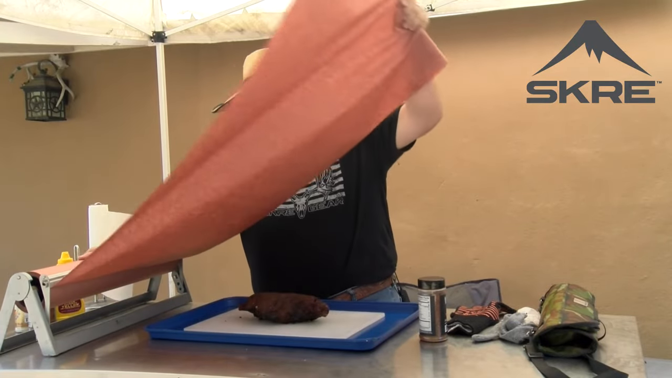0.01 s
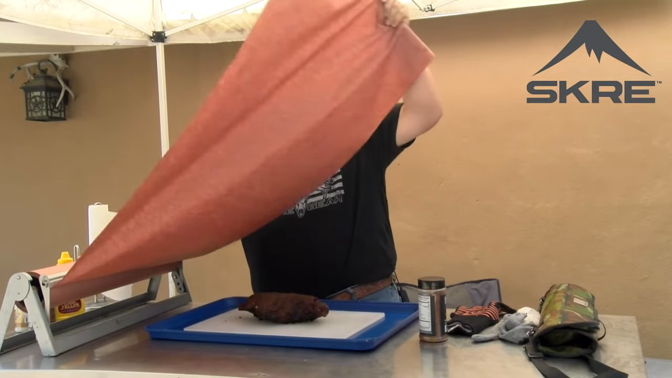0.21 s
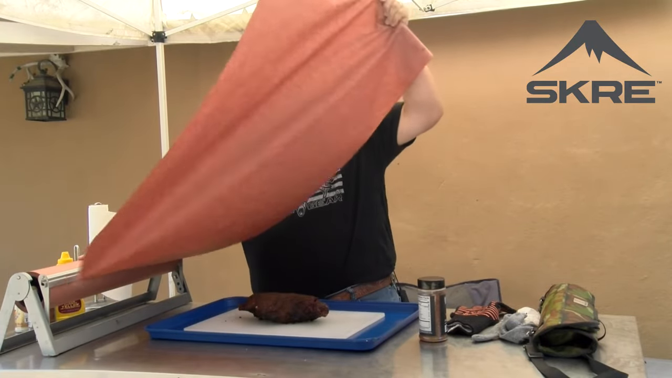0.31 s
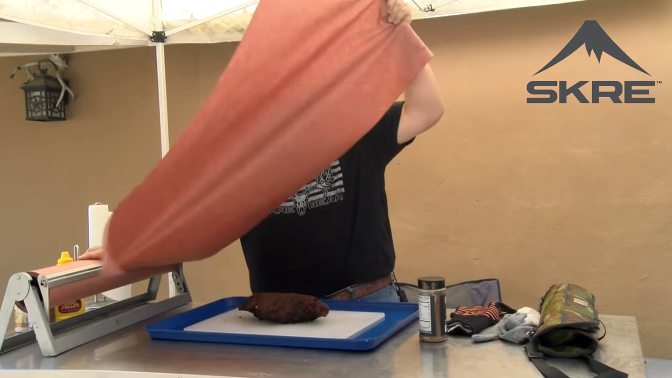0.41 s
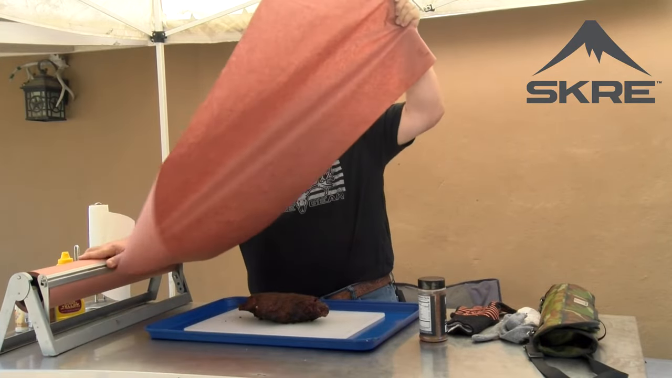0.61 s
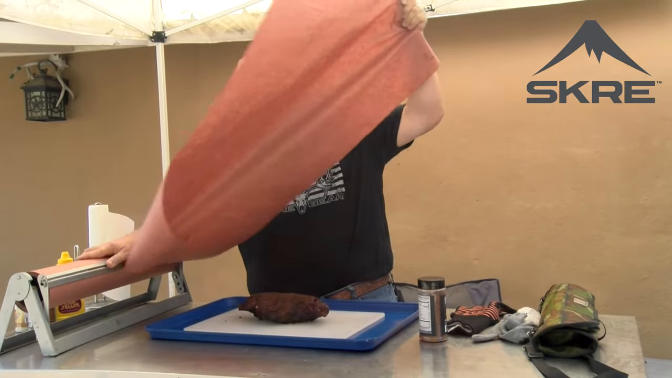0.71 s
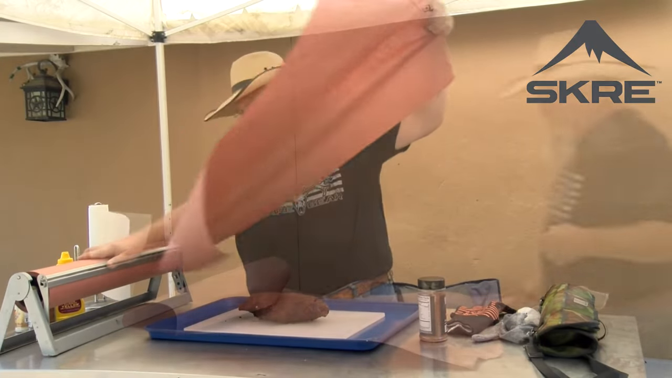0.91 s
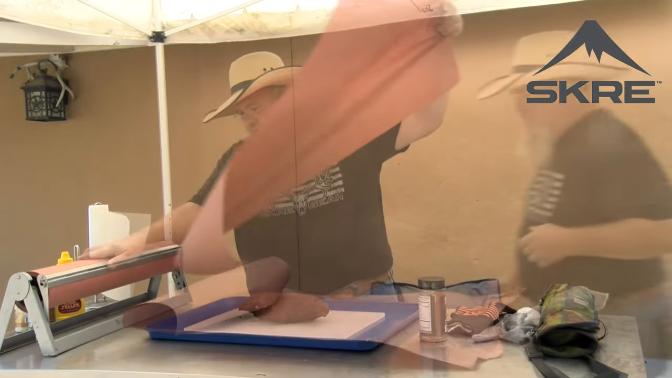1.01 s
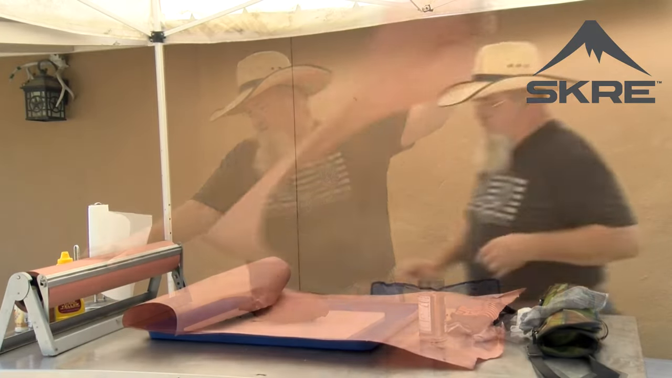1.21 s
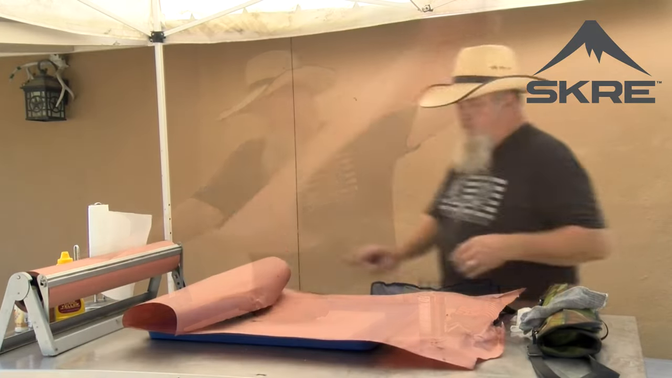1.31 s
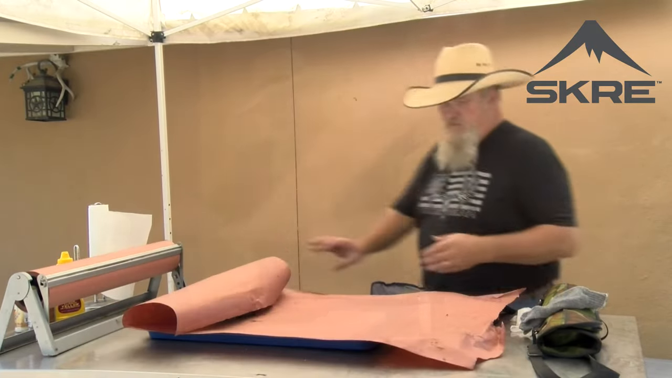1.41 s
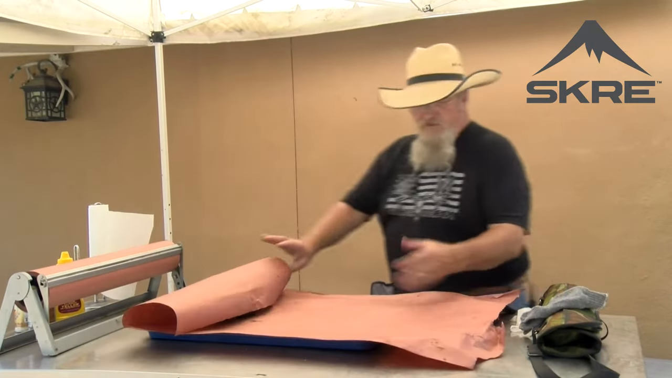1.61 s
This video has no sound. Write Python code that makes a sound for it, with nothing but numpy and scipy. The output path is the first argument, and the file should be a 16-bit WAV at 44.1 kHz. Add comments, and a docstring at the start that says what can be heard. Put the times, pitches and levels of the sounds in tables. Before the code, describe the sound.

Stiff paper tearing: faint rustle and small crackles first, then a loud, coarse rip from about 0.19 s, with sharp snaps near 0.25-0.29 and low flapping. It eases around 0.5-0.66, surges again until 1.05, then drops quickly. Soft rustles and sparse crease ticks follow at 1.15, 1.33 and 1.48 over faint hiss; a tiny dropout at 1.58, a dull faint knock at 1.68. Close, dry, slightly overloaded.

```python
"""Under a canopy, a long sheet of stiff paper is ripped off a roll against a blade in a few tugs,
then settles on a table with a soft rustle and a few creases; the sound drops out for an instant near the end.
Tearing is a random train of short pops with fibre fizz, rasp, flap and blade ring; creases are single pops.
Rustle, slides, rumble and air are shaped random signals, the knock on the table is a decaying sine,
and the canopy answers the paper and the knock with a short dull tail."""
import sys
import numpy as np
from scipy import signal
from scipy.io import wavfile
from scipy.ndimage import uniform_filter1d

SR = 44100
rng = np.random.default_rng(int(sys.argv[2]) if len(sys.argv) > 2 else 0)


def to_wav(sig):
    """Store sig (one row per channel, or 1-D mono) as 16-bit WAV at the path in sys.argv[1].

    Samples outside -1..1 are clipped; the rate is SR.
    """
    pcm = np.clip(np.atleast_2d(sig), -1, 1) * 32767
    pcm = np.round(pcm).astype(np.int16)
    wavfile.write(sys.argv[1], SR, pcm.T)  # frames by channels


N = 74970

# The tugs, one table each. Each row: time in seconds, level of the sheet's pops in dB, then fibre fizz
# and low flap in dB over the pops, pitch of the sheet in Hz, pitch of the rasp in Hz,
# then top treble and blade ring in dB over the pops.
TUGS = [
    [(0.084, -47, -11, 5, 1280, 6460, -48, -6), (0.102, -35.5, 2.5, -18.5, 1330, 6340, -19, -15),
     (0.135, -36.5, -4, -3.5, 1390, 6350, -22, -18), (0.139, -28, -9, -24, 1410, 6330, -30, -11),
     (0.154, -40.5, -3, -5, 1326, 6220, -23, -8), (0.18, -38, -7, 1, 1190, 5670, -46, -19),
     (0.186, -37, -3, -7, 1170, 5580, -31, -6), (0.19, -47, -21, -15, 1120, 5570, -33, 1)],
    [(0.194, -13, -20, -15, 1353, 6320, -38, -17), (0.202, -32, -3, 10.5, 1480, 6380, -26, -10),
     (0.212, -14.5, -13, -26, 1440, 6500, -27, -26), (0.218, -30.5, 7, -5, 1520, 6700, -25, -28),
     (0.248, -27, -9.5, -5.5, 1370, 6660, -25, -29), (0.25, -38, 16, -27, 1270, 6500, -34, -14)],
    [(0.253, -15.5, -8.5, -15.5, 1278, 5700, -35, -17.5), (0.281, -17.5, -2.5, -9.5, 1183, 5400, -23, -9),
     (0.323, -9.5, -12.5, -26, 1281, 6560, -27, -20.5), (0.369, -17, -4, -15, 1315, 6000, -25, -36),
     (0.413, -20.5, -5, -12, 1313, 6300, -32, -28), (0.432, -29.5, -7, -6, 1180, 6360, -23, -38),
     (0.461, -30.5, -5.5, -9, 1320, 6400, -31, -15), (0.505, -38.5, -10, -5.5, 1230, 6820, -34, -9)],
    [(0.509, -27, -20, -26, 1400, 6700, -27, -30), (0.519, -28, -5.5, -10, 1440, 6590, -30, -6),
     (0.545, -21.5, -13.5, -8.5, 1320, 7040, -25, -23), (0.562, -15.5, -8, -17, 1390, 8400, -23, -14.5),
     (0.601, -35, -6.5, -6.5, 1405, 7600, -33, -12), (0.619, -29, -4.5, -7.5, 1375, 7400, -26, -2.5),
     (0.651, -35.5, -10, -2.5, 1800, 5840, -26, -27), (0.66, -39.5, 1, 8, 1830, 5700, -32, -17)],
    [(0.664, -40, 7, -9, 1560, 6410, -26, -11), (0.674, -24, -7.5, -14, 1484, 6600, -23, -40),
     (0.712, -13, -9, -9, 1380, 6800, -41, -35), (0.764, -16, -11.5, -15, 1527, 5500, -33, -10.5),
     (0.808, -13.5, -10, -8.5, 1496, 6400, -32, -9), (0.862, -12, -8, -12, 1848, 6300, -41, -17),
     (0.908, -18.5, -8.5, -5.5, 2270, 6860, -45, -3), (0.96, -22, 1, -6, 2070, 7900, -42, 0.5),
     (0.996, -17.5, 1.5, -8, 1590, 7540, -39, -2), (1.009, -18, -3.5, -7, 1514, 7060, -34, -14),
     (1.022, -14.5, -1, -10, 1482, 6040, -33, -17), (1.048, -20.5, 3, -5.5, 1520, 5560, -30.5, -8.5)],
]
# Colours of the fibre fizz, its top treble and the flap. Each row: frequency in Hz, relative density in dB per Hz.
FIZZ_COLOUR = [(1650, -9), (2800, -8.5), (3250, -9.5), (4140, -7), (5200, -10.5), (5630, -8.5),
               (7980, -18.5), (9440, -10), (11800, -34.5), (15300, -28), (22000, -120)]
TREBLE_COLOUR = [(9000, -21), (11500, -8), (14600, 0), (16300, -9)]
FLAP_COLOUR = [(88, -47.5), (150, -20.5), (247, -17.5), (310, -5.5), (650, -4.5), (840, -25), (1430, -120)]
POPS_PER_S, POP_SPREAD_DB, POP_CYCLES, PITCH_SPREAD = 2200, 2.5, 0.647, .17  # pitch spread is in log units
FIBRES_PER_S, FIBRE_SPREAD_DB, CLUMP_DB = 6000, 2.5, 1.7
RASP_DB, RASP_WIDTH_HZ, PATCH_DB = -2, 3100, 2.5  # rasp level is over the fizz
BLADE_HZ, BLADE_WIDTH_HZ = 2853, 1060  # the blade's edge sings along


def tearing_pops(train):
    """Impulse excitation: each notch that gives way sets off one pop scattered around the sheet's pitch."""
    pitches = np.geomspace(500, 3600, num=28)
    scattered = joined(TUGS, column=4) * np.exp(PITCH_SPREAD * rng.standard_normal(N))
    bin_of = np.searchsorted(pitches, scattered)
    pops = np.zeros(N)
    for k, hz in enumerate(pitches):
        shape = np.sqrt(hz) * pop(hz, POP_CYCLES)  # the root gives every pitch equal energy
        pops += signal.oaconvolve(train * (bin_of == k), shape)[:N]
    return evened(pops)


def fibre_fizz(jolts):
    """Superposed micro-fractures: dense tiny clicks, joined by the notches' jolts, make fizz, rasp and treble."""
    breaks = evened(clicks(FIBRES_PER_S, FIBRE_SPREAD_DB) * random_signs())
    fibres = (breaks + 0.48 * jolts) * clumps(0.72, size=200)
    rasp = resonate(fibres * random_signs(), joined(TUGS, column=5), RASP_WIDTH_HZ)
    fizz = patchy(colour(fibres, FIZZ_COLOUR) + amp(RASP_DB) * rasp, PATCH_DB)
    treble = patchy(colour(fibres, TREBLE_COLOUR), 1.3)
    return fizz * amp(joined(TUGS, column=2)) + treble * amp(joined(TUGS, column=6))


def low_flap(jolts):
    """Broadband forcing: noise and the notches' jolts, coloured low, make the sheet's flap."""
    flap = patchy(colour(rng.standard_normal(N) + 1.04 * jolts, FLAP_COLOUR), 1.65)
    return flap * amp(joined(TUGS, column=3))


def blade_ring(jolts):
    """Driven resonance: the notches' jolts excite one fixed, heavily damped mode of the blade."""
    ring = resonate(jolts * random_signs(), np.full(N, BLADE_HZ), BLADE_WIDTH_HZ)
    return ring * amp(joined(TUGS, column=7))


def rip():
    """Fracture as a random point process: one train of giving notches drives pops, fizz, flap and blade."""
    train = clicks(POPS_PER_S, POP_SPREAD_DB)
    jolts = evened(train - train.mean())
    pops = tearing_pops(train)
    driven = fibre_fizz(jolts) + low_flap(jolts) + blade_ring(jolts)
    level = evened(clumps(CLUMP_DB, size=150)) * amp(joined(TUGS, column=1))
    return level * inside(TUGS) * (patchy(pops, 1.0) + driven)


# Single creases and notches. Each row: start in seconds, level of the pop in dB, pitch in Hz,
# brightness of the tick in dB over the pop, ring in cycles (held within 0.4 to 2.2).
CREASES = [(0.061, -30.5, 990, -7, 0.76), (0.085, -23.5, 2300, -9, 0.72), (0.098, -34, 1140, -16, 1.1),
           (0.1375, -19, 1530, -18, 1.18), (0.193, -8.5, 1920, -18.5, 0.7), (0.207, -24, 1200, -18, 0.64),
           (0.211, -6, 1570, -16.5, 0.71), (0.225, -20, 1200, -10, 0.94), (0.236, -18, 1250, -9, 1.17),
           (0.253, 0.5, 1285, -17, 0.87), (0.268, -6.5, 1000, -16, 1.03), (0.274, -7, 1000, -4, 0.86),
           (0.286, -1.5, 980, -27, 1.08), (0.393, -3, 1280, -16, 0.39), (0.414, -1, 1190, -20, 0.42),
           (0.509, -19, 1040, -13, 0.78), (0.535, -10, 1690, -28, 0.48), (0.62, -13, 1470, -7, 0.96),
           (0.6609, -9.5, 1980, -8, 0.73), (0.668, -28, 1840, -12, 0.54), (0.698, -8, 1200, -4.5, 1.12),
           (0.713, -5, 2010, -23, 0.86), (0.744, -10, 1170, -28, 1.1), (0.979, -14, 1380, -9, 0.8),
           (1.013, -8, 1410, -11, 0.64), (1.0226, -1.5, 1400, -20, 0.87), (1.029, -7.5, 1440, -5, 0.69),
           (1.044, -7.5, 1470, -26, 0.93), (1.144, -24, 1394, -45, 1.9), (1.1592, -20, 1820, -38, 1.9),
           (1.221, -32.5, 1500, -7, 0.57), (1.3272, -36, 2600, -15, 1.3), (1.4776, -27, 1960, 3.5, 1.7),
           (1.678, -37, 1135, -23, 1.81), (1.683, -36.5, 1170, -25, 1.9)]
# Colour of a snap's tick. Each row: frequency in Hz, relative density in dB per Hz.
TICK_COLOUR = [(1800, -21), (2900, 2), (5670, 1), (9500, -8), (16000, -29)]
SNAP_TAIL_S, SNAP_TAIL_DB, TICK_S = 0.0028, -9.5, 0.0014  # times are to 1/e


def snaps():
    """Transient response: each crease or notch is one strong pop, a bright tick and a short crackling tail."""
    length = 2000  # samples a snap
    out, t = np.zeros(N + length), np.arange(length) / SR
    noises = rng.standard_normal((len(CREASES), length))
    hiss = colour(rng.standard_normal(N), TICK_COLOUR)
    for (s, db, hz, bright_db, cycles), noise in zip(CREASES, noises):
        at = round(s * SR)
        swing = pop(hz, np.clip(cycles, .4, 2.2))
        crackle = evened(signal.fftconvolve(noise, swing)[:length])
        tail = crackle * np.exp(-t / SNAP_TAIL_S) * amp(SNAP_TAIL_DB)
        u = (t - (2 * cycles - .5) / hz) / TICK_S  # the tick starts as the spike rises
        tick = np.roll(hiss, -at)[:length] * (u > 0) * np.exp(-abs(u)) * amp(bright_db)
        spike = np.r_[swing, np.zeros(length - len(swing))]
        out[at:at + length] += amp(db) * (spike + tail * np.minimum(t * hz, 1) + tick)
    return out[:N]


# The stretches of rustle, one table each. Each row: time in seconds, level of the body in dB,
# fizz in dB over the body.
RUSTLES = [
    [(0.0, -33.5, -6.5), (0.016, -55.5, -0.5), (0.034, -42.5, -10), (0.056, -57, -7), (0.062, -47, -31),
     (0.074, -45, -9), (0.082, -48, -9)],
    [(1.048, -14, -27), (1.058, -26, -9), (1.108, -41, -5.5), (1.164, -34, -17.5), (1.19, -52, -3.5),
     (1.321, -47, -6.5), (1.326, -35, -6.5), (1.342, -42, -4), (1.35, -49, -3), (1.39, -42.5, -8),
     (1.4, -42.5, -8.5), (1.466, -51, -1), (1.476, -37, -8)],
    [(1.48, -39, -1), (1.5, -42, -6), (1.54, -48.5, -2.5), (1.566, -42, -8), (1.578, -55, 7),
     (1.582, -54, 13)],
    [(1.672, -68, -17), (1.676, -53, 5), (1.678, -49, -7), (1.684, -47, -16), (1.7, -60, -17)],
]
# Colours of the rustle's body and of its treble. Each row: frequency in Hz, relative density in dB per Hz.
BODY_COLOUR = [(88, -54), (150, -14.5), (351, -5.5), (446, 1.5), (496, -2), (674, -4.5), (952, -1),
               (2030, -5.5), (3600, -18), (4680, -30), (7920, -120)]
SILK_COLOUR = [(1760, -10), (3000, -1.5), (4400, -1), (4930, -2), (9110, -9), (11100, -20), (15600, -23)]


def rustle():
    """Friction noise: soft rubbing in the slack sheet is many tiny clicks, with silky noise above."""
    rubs = clicks(6000, 3.2) * random_signs() * clumps(.8, size=400)
    body = patchy(colour(rubs, BODY_COLOUR), 1.5)
    fizz = patchy(colour(rng.standard_normal(N) * clumps(1.5, size=300), SILK_COLOUR), 2.2)
    return amp(joined(RUSTLES, column=1)) * inside(RUSTLES) * (body + amp(joined(RUSTLES, column=2)) * fizz)


# Narrow hisses as the sheet slides. Each row: start in seconds, length in seconds, pitch in Hz,
# width in Hz, level in dB.
HISSES = [(1.1, .1, 8300, 2500, -53), (1.265, .03, 8500, 3000, -57), (1.35, .126, 7020, 250, -60),
          (1.39, .086, 4600, 300, -59), (1.39, .086, 8600, 400, -64)]


def slides():
    """Narrow-band friction noise: each slide sings in one band, swelling and fading."""
    out, t = np.zeros(N), np.arange(N) / SR
    for s, length, hz, width_hz, db in HISSES:
        arch = np.sin(np.pi * np.clip((t - s) / length, 0, 1)).clip(0)
        level = amp(db) * np.sqrt(arch) * clumps(2.5, size=400)
        out += level * resonate(rng.standard_normal(N), np.full(N, hz), width_hz)
    return out


THUMP_S, THUMP_DB, THUMP_HZ, THUMP_DECAY_S = 1.679, -45.5, 390, 0.0061


def thump():
    """Damped oscillation: a dull knock on the table is one low sine that swells and dies quickly."""
    t = np.arange(2000) / SR
    swell = t / THUMP_DECAY_S * np.exp(1 - t / THUMP_DECAY_S)  # reaches 1 after one decay time
    out, at = np.zeros(N + 2000), round(THUMP_S * SR)
    out[at:at + 2000] = amp(THUMP_DB) * np.sin(2 * np.pi * THUMP_HZ * t) * swell
    return out[:N]


# Low rumble of the waved sheet. Each row: time in seconds, level in dB.
BOOM_LEVEL = [(0.0, -52), (0.074, -59.5), (0.278, -34), (0.344, -48), (0.392, -36), (0.524, -44),
              (0.544, -36.5), (0.8, -40), (0.814, -50), (0.912, -34.5), (1.008, -41), (1.026, -30.5),
              (1.25, -51.5), (1.7, -65)]
# Its colour. Each row: frequency in Hz, relative density in dB per Hz.
BOOM_COLOUR = [(12, 9.5), (20, 1.5), (108, -9.5), (220, -7.5), (290, -38), (480, -120)]


def boom():
    """Low-frequency radiation: the waved sheet's rumble is low-coloured noise on a level curve."""
    return amp(curve(BOOM_LEVEL, column=1)) * colour(rng.standard_normal(N), BOOM_COLOUR)


CANOPY_T60_S, CANOPY_DB, CANOPY_HZ = 0.12, -17.5, 3460


def canopy(x):
    """Diffuse reverberation: canopy, wall and table return a short dull tail of decaying noise."""
    t = np.arange(SR // 2) / SR
    taps = rng.standard_normal(len(t)) * amp(-60 * t / CANOPY_T60_S) * (t > .004)
    taps = signal.lfilter(*signal.butter(1, CANOPY_HZ, fs=SR), taps)
    return amp(CANOPY_DB) * signal.fftconvolve(x, taps / np.linalg.norm(taps))[:N]


# Colour of the background air. Each row: frequency in Hz, relative density in dB per Hz.
AIR_COLOUR = [(24, -39), (40, 2.5), (1250, 0.5), (2160, 0), (2510, -2.5), (3930, -12), (4240, -6.5),
              (10100, -12.5), (13700, -27.5), (15500, -23)]
AIR_DB = -54.5


def air():
    """Stationary noise: the background is a steady coloured hiss."""
    return amp(AIR_DB) * colour(rng.standard_normal(N), AIR_COLOUR)


def pop(hz, cycles):
    """Elastic recoil: the sheet bulges and springs back, one spike with a swing either side."""
    u = np.arange(400) / SR * hz - 2 * cycles  # cycles from the spike
    bell = np.exp(-(u / cycles) ** 2)
    swing = np.cos(2 * np.pi * u) * bell * (1 + .5 * np.tanh(u))
    return swing - bell * swing.sum() / bell.sum()  # no net pressure remains


def clicks(per_s, spread_db):
    """Poisson-like process: clicks at random samples, with levels spread upward in dB."""
    return amp(spread_db * np.minimum(rng.exponential(1, N), 4)) * (rng.random(N) < per_s / SR)


def random_signs():
    """Random polarity: each sample is a push or a pull."""
    return rng.choice([-1, 1], N)


def clumps(depth_db, size):
    """Amplitude modulation: a level wandering at random over about `size` samples."""
    return amp(depth_db * evened(uniform_filter1d(rng.standard_normal(N), size=size)))


def patchy(x, depth_db):
    """Time-frequency modulation: drifting patches of stronger and weaker pitch, as folds come and go."""
    z = signal.stft(x, nperseg=256, noverlap=192)[2]
    field = uniform_filter1d(rng.standard_normal(z.shape), size=4, axis=0)  # across pitch
    field = evened(uniform_filter1d(field, size=24, axis=1))  # across time
    return evened(signal.istft(z * amp(depth_db * field), nperseg=256, noverlap=192)[1][:N])


def resonate(x, hz, width_hz):
    """Heterodyned resonance: shift the pitch curve to zero, smooth with two poles, shift back."""
    turn = np.exp(2j * np.pi * np.cumsum(hz) / SR)
    r = np.exp(-np.pi * width_hz / SR)
    return evened((turn * signal.lfilter([1], [1, -2 * r, r * r], x / turn)).real)


def colour(x, points):
    """Minimum-phase filtering: a causal filter with the given spectrum, falling away beyond its ends."""
    f, db = np.transpose(points)
    f, db = np.r_[f[0] / 10, f, f[-1] * 2], np.r_[db[0] - 30, db, db[-1] - 30]
    hz = abs(np.fft.fftfreq(8192, 1 / SR))
    log = np.interp(np.log(hz + 1), np.log(f), db) * np.log(10) / 20
    taps = np.fft.ifft(np.exp(log - 1j * signal.hilbert(log).imag)).real[:4096]
    return evened(signal.oaconvolve(x, taps)[:N])


def curve(table, column):
    """Linear interpolation: one column as a value per sample, held beyond the ends."""
    rows = np.array(table)
    return np.interp(np.arange(N) / SR, rows[:, 0], rows[:, column])


def joined(tables, column):
    """Piecewise interpolation: one column of several tables as a value per sample."""
    return curve(np.concatenate(tables), column=column)


def inside(tables):
    """Gating: 1 while any table runs, with quick edges."""
    t = np.arange(N) / SR
    running = sum((t >= rows[0][0]) & (t <= rows[-1][0] + 1 / SR) for rows in tables)
    return uniform_filter1d(1. * running.clip(0, 1), size=40)


def amp(db):
    """Decibel law: level in dB to amplitude."""
    return 10 ** (np.asarray(db) / 20)


def evened(x):
    """Power normalisation: scale to a root-mean-square of 1."""
    return x / np.sqrt(np.mean(x ** 2) + 1e-20)


def scene():
    """Superposition: the paper and the knock, the rumble, the air and the canopy's tail add up."""
    paper = rip() + snaps() + rustle() + slides() + thump()
    return (paper + boom() + air() + canopy(paper))[None]


# Microphone colour. Each row: frequency in Hz, relative response in dB.
MIC_COLOUR = [(100, 7), (500, -0.73), (900, 1.94), (2000, 0.67), (3100, 0.65), (3700, -3), (6000, -1.93),
              (16000, 1.4)]
DROP_S, DROP_WIDTH_S = 1.584, 0.0042  # centre of the drop-out, and its half-width at 1/e
EDGE_HZ = 16100


def record(dry):
    """Transducer chain: microphone colour, a brief drop-out, soft overload, then the band limit."""
    t = np.arange(N) / SR
    mic = colour(dry[0], MIC_COLOUR) * np.std(dry)  # the filter evens the level, so restore it
    mic = mic * (1 - np.exp(-((t - DROP_S) / DROP_WIDTH_S) ** 2))
    overloaded = 0.98 * np.tanh(mic / 1.165)
    band = signal.firwin(511, EDGE_HZ, window=("kaiser", 7), fs=SR)
    return signal.oaconvolve(overloaded, band, "same")[None]


dry = scene()
out = record(dry)
to_wav(out)
```